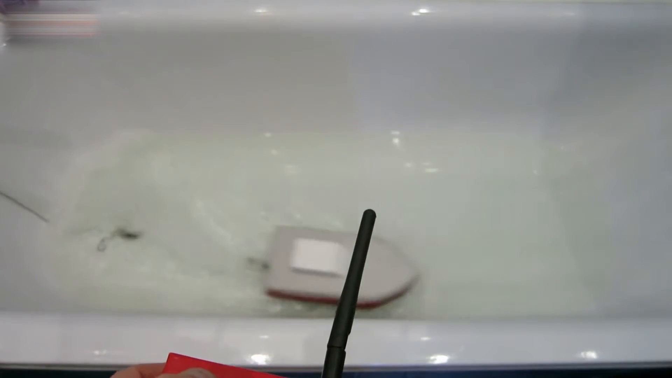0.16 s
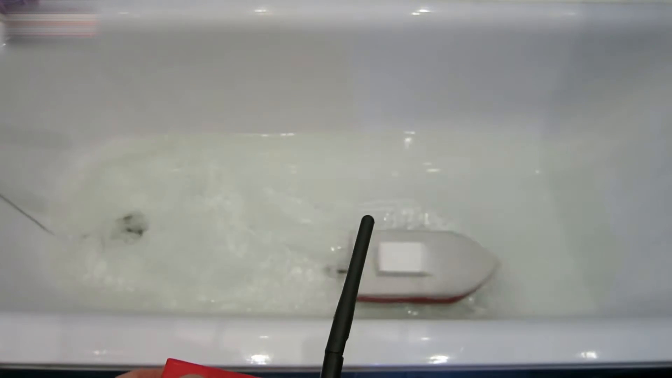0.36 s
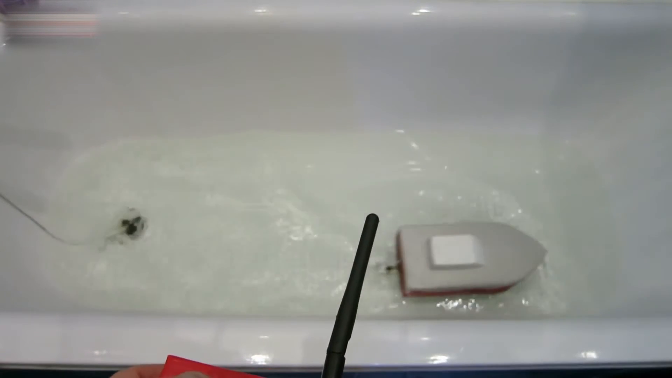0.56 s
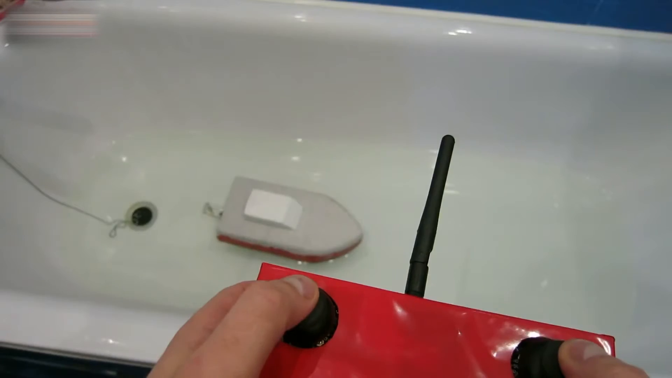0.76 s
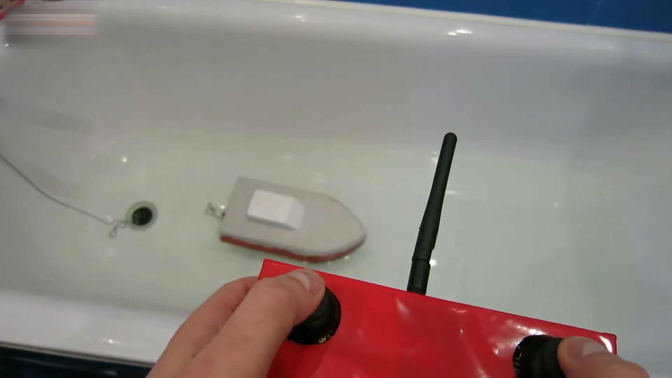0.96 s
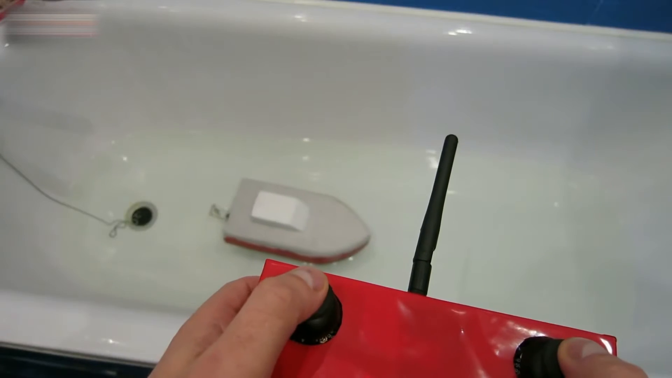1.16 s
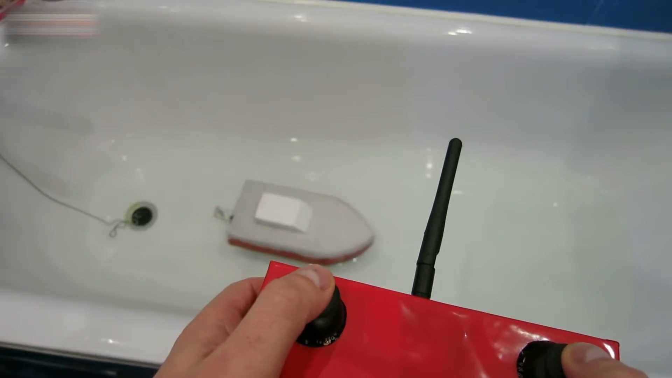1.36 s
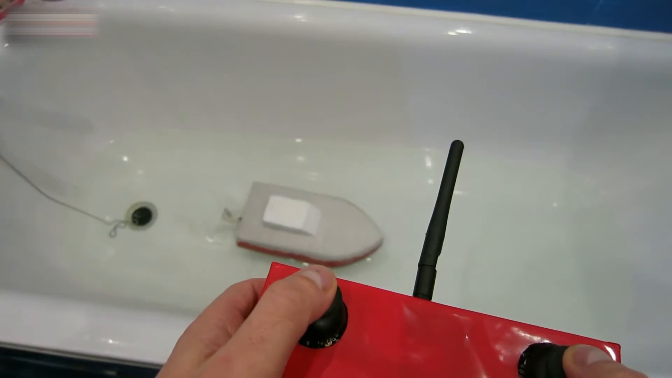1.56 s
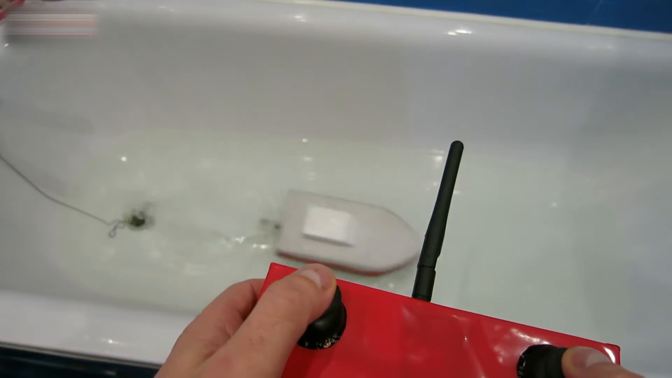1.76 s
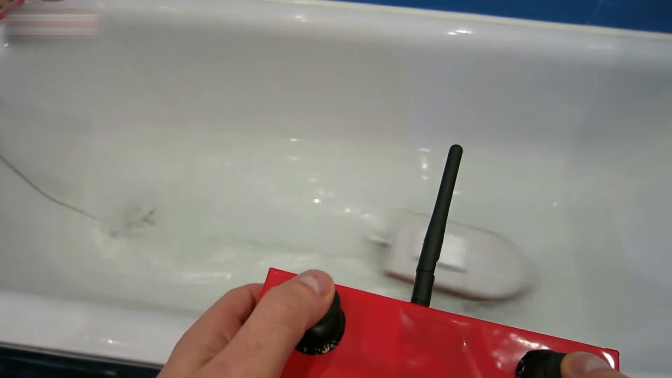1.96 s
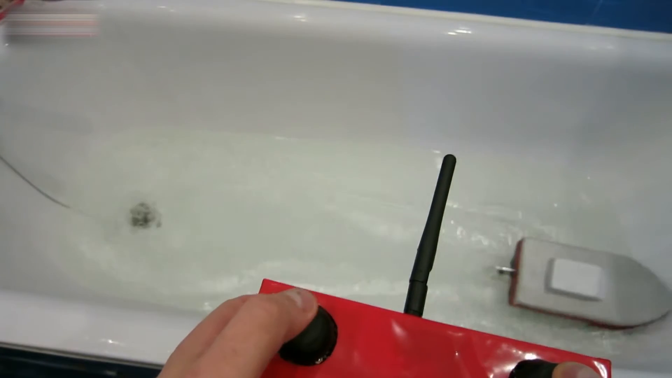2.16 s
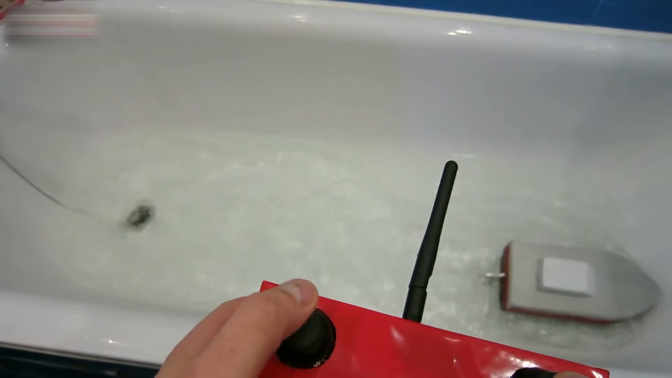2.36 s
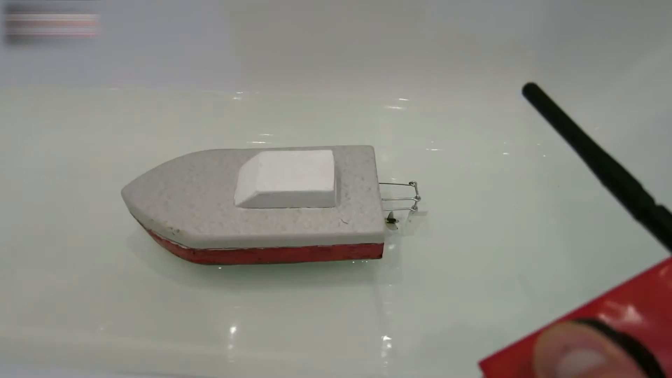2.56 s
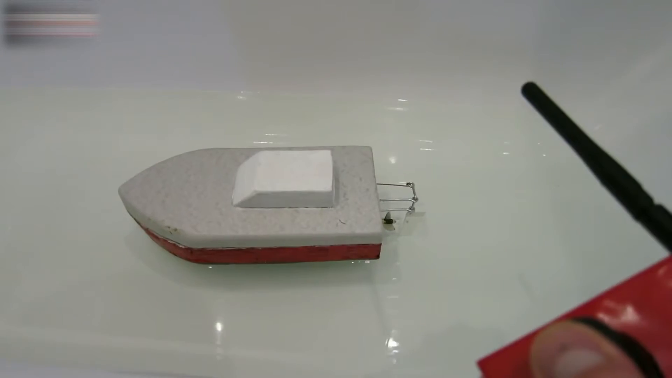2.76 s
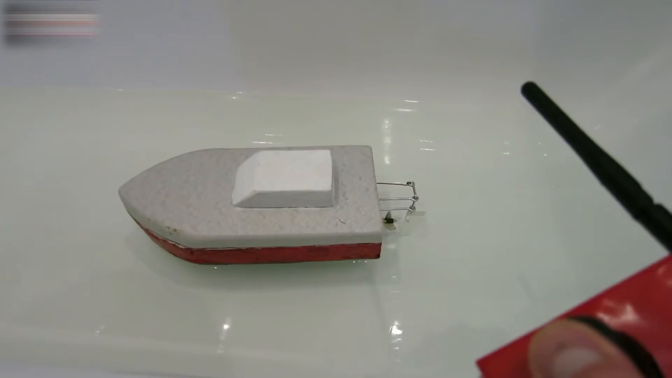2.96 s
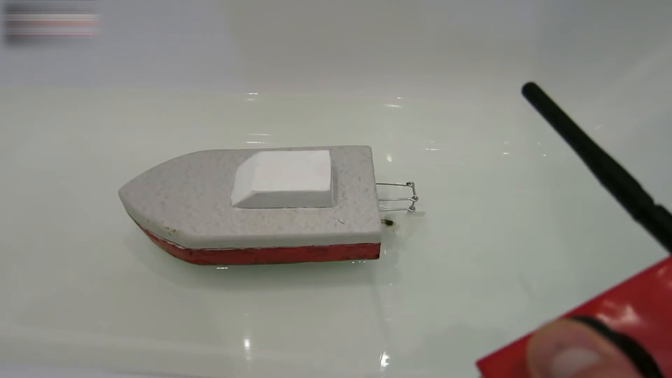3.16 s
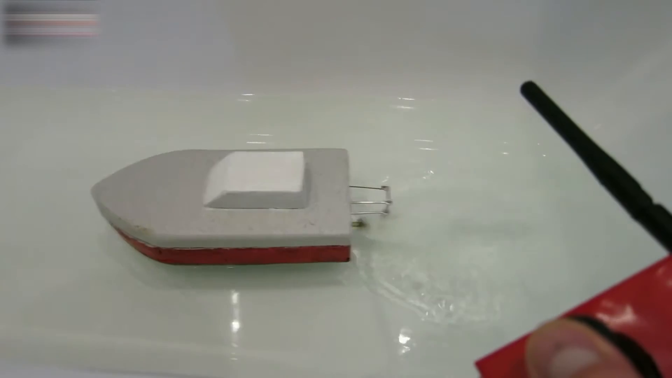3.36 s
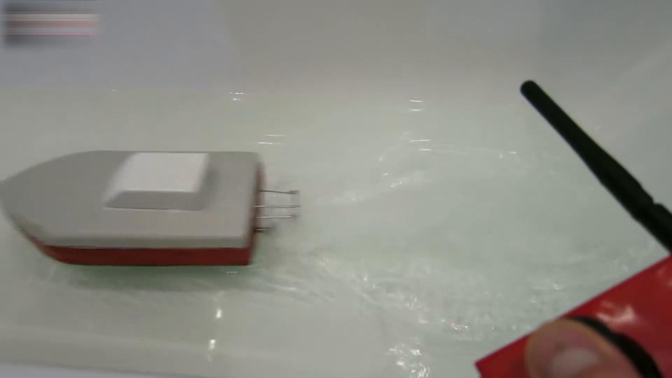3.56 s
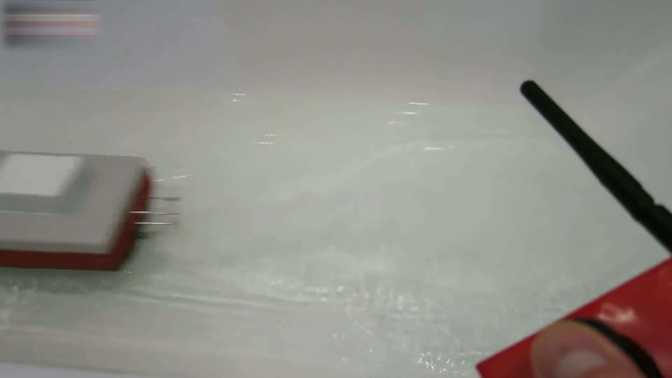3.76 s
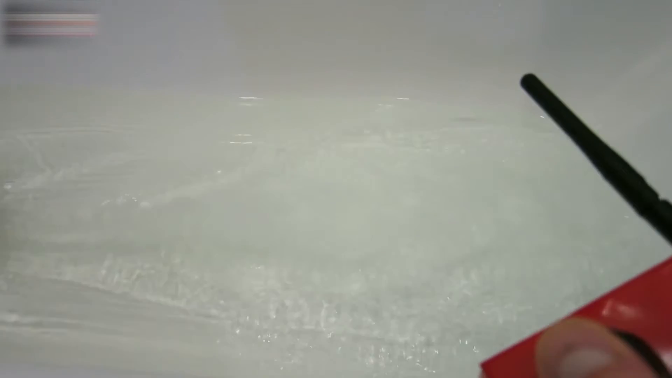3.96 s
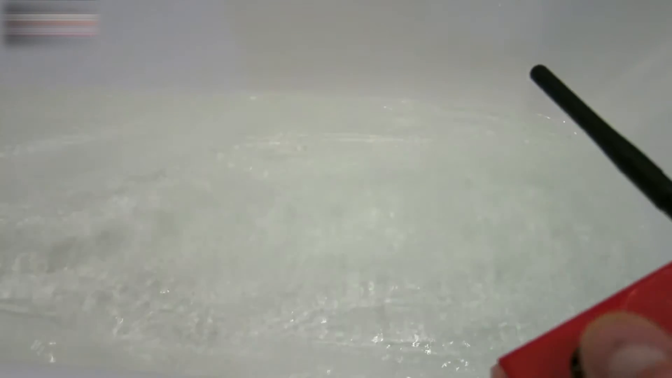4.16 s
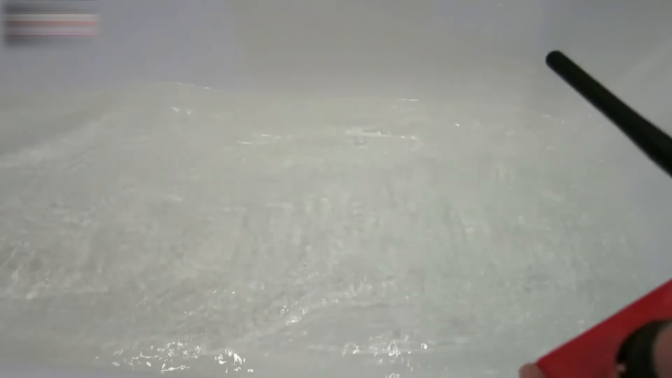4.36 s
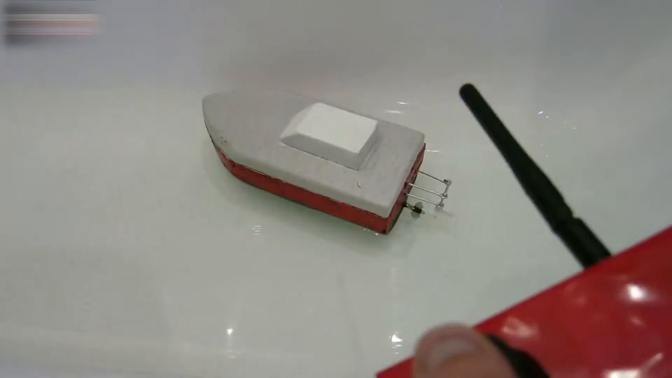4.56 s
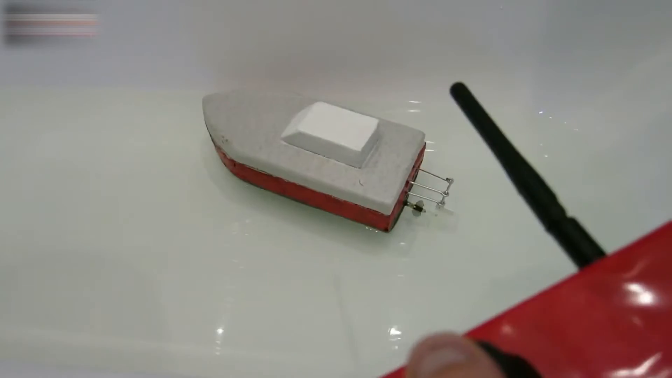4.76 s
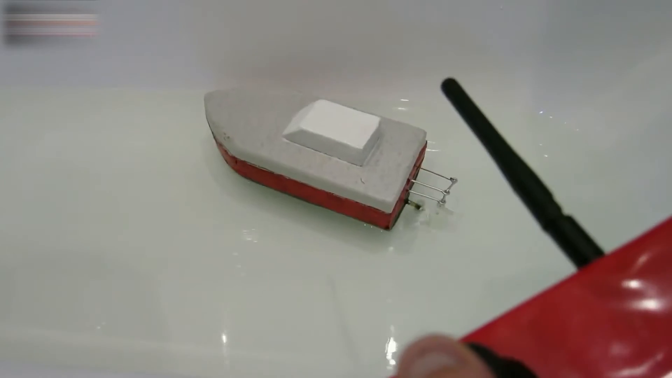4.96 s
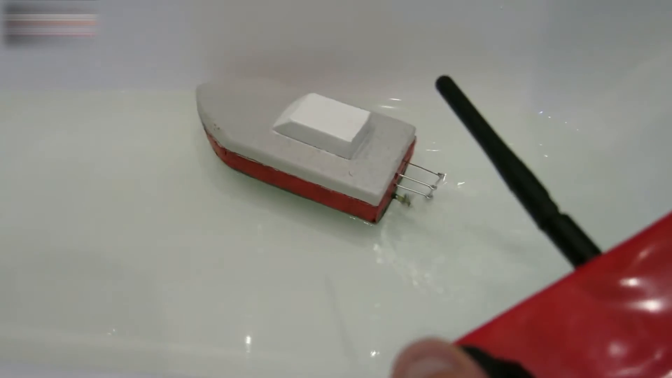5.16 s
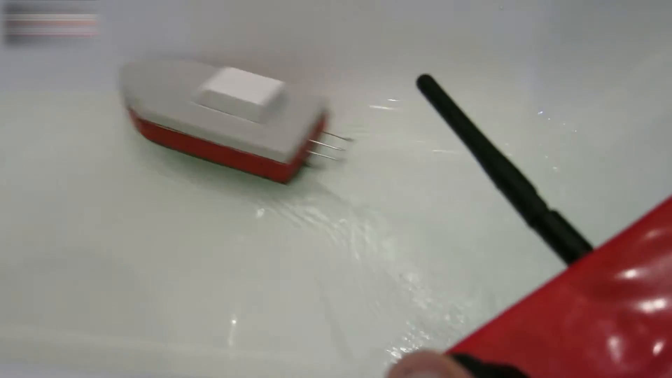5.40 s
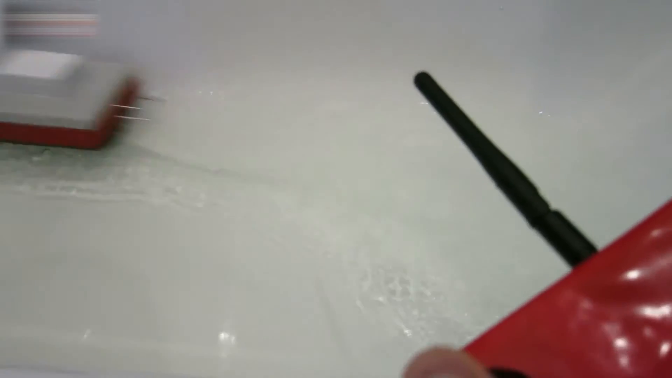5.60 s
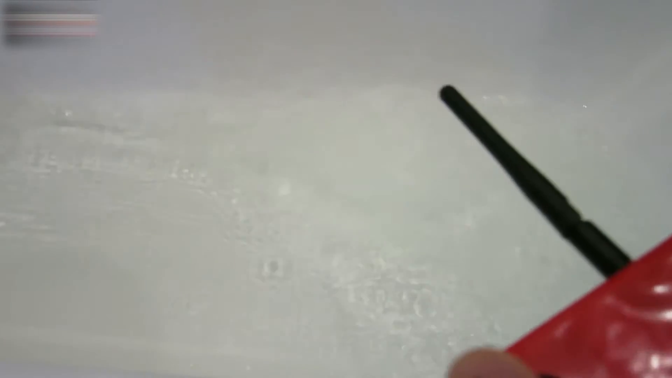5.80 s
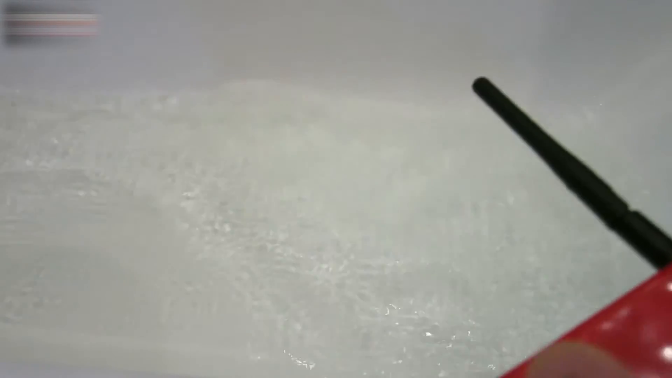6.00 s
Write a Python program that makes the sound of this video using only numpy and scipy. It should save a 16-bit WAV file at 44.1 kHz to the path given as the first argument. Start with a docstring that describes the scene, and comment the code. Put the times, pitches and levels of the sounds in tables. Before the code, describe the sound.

Close stereo pickup beside a bathtub, over dull room noise and faint hum. Four bursts of a small electric propeller, each with hissing spray and bubbling churn, stop suddenly into a short run-down and foam fizz. The first is cut short, the second climbs, the third is a lower growl, the fourth screams highest. Between them come plinking drops, hull knocks on the tub, small ticks and one rasping gear whir.

```python
"""A toy speedboat crosses a bathtub in a hard-walled bathroom, over dull room noise and a faint hum.
At first a dash is already under way: the two-bladed propeller whines, then stops, and foam fizzes.
Two more dashes start with jolts and cracks; the blades thrash air into the water, then spin up.
Drops plink and the hull bumps the tub between dashes; then the rudder servo whirs once.
A last jolt starts the fourth dash, the fastest whine of all; a fast limiter holds down loud parts."""
import sys
import numpy as np
from scipy import signal
from scipy.fft import rfft, irfft, next_fast_len
from scipy.io import wavfile
from scipy.ndimage import uniform_filter1d, minimum_filter1d, map_coordinates

SR = 44100
rng = np.random.default_rng(int(sys.argv[2]) if len(sys.argv) > 2 else 0)


def file_out(sig):
    """Save sig as 16-bit WAV at sys.argv[1]."""
    # one column per channel
    cols = np.atleast_2d(sig).T
    # limit, then scale
    lim = np.clip(cols, -1, 1)
    pcm = np.round(lim * 32767).astype(np.int16)
    wavfile.write(sys.argv[1], SR, pcm)


N = 266099
TIME = np.arange(N) / SR

# The hull bumps the tub: (time [s], knock level [dB], boom level [dB])
BUMPS = [(0.063, -39, -42.5), (2.345, -40.5, -85), (2.351, -31, -84), (4.155, -27, -56), (4.163, -19, -60),
         (4.176, -36, -56), (5.946, -37, -87)]
# Spectrum of churned water: (frequency [Hz], level [dB])
CHURN_COLOUR = [(60, -25), (180, -53), (300, 7), (480, -4.5), (750, 5.5), (1100, -2), (1600, 1.5),
                (2400, -1.5), (3600, -6.5), (5500, -13.5), (8000, -21.5), (15000, -45)]
# Spectrum of bursting foam: (frequency [Hz], level [dB])
FOAM_COLOUR = [(500, 1), (2000, 0.5), (4000, 0), (6500, 0), (9000, 0), (12000, -1), (14000, -8),
               (16000, -32)]
# Spectrum of rasping gear teeth: (frequency [Hz], level [dB])
RASP_COLOUR = [(650, -6.5), (1100, -2), (1390, -10), (1530, 2.5), (1680, -10), (2610, -7), (3010, -4.5),
               (3890, -9), (4790, 2), (5720, -4), (7800, -1.5), (9110, -8), (10200, -5.5), (12100, -11),
               (15500, -31)]
# Spectrum of a jolt of the drive: (frequency [Hz], level [dB])
JOLT_COLOUR = [(100, -38), (300, 5), (480, 9), (800, 8), (1300, 8), (2000, 8), (3200, -9), (5000, -38),
               (6500, -52), (8200, -10.5), (12000, -61), (16000, -37)]
# Standing waves of the tub: (frequency [Hz], width [Hz], level [dB])
TUB = [(92.6, 6.9, 3), (134.3, 19, 12), (177.3, 2.8, 21.5), (219, 6.9, 11), (298, 14, -14), (442.6, 12, 11),
       (536, 12, 7.5), (674, 26, 0), (828, 17, -6), (1120, 140, 3), (1553, 100, 3), (2080, 90, -8)]
# The dashes: (motor on [s], blades bite [s], throttle shut [s], foam stops and room noise returns [s],
# heave level [dB], churn level [dB], spray level [dB], fading as the boat leaves [dB/s],
# stern wave level [dB], shaft wobble level [dB]); the last foam stop lies beyond the end
DASHES = [(-0.6, -0.55, 0.16, 0.74, -42, -41, -42, -4.5, -43, 4.5),
          (1.468, 1.502, 2.18, 2.62, -37, -34.5, -34.5, 12.5, -47.5, -38),
          (3.205, 3.216, 3.888, 4.585, -42.5, -37, -39, 2.5, -38, -5),
          (4.992, 5.069, 5.71, 8.9, -37, -33, -34, 20.5, -64, -28)]
# Speed of the propeller, one table per dash: (time [s], blade rate [Hz])
SPIN_1 = [(0.0, 291), (0.06, 287), (0.1, 296), (0.15, 297), (0.17, 288)]
SPIN_2 = [(1.7, 187), (1.74, 250), (1.765, 304), (1.802, 339), (1.838, 363), (1.942, 366), (2.08, 353),
          (2.112, 363), (2.132, 384), (2.158, 384)]
SPIN_3 = [(3.38, 126), (3.43, 170), (3.462, 221), (3.54, 220), (3.655, 223), (3.69, 249), (3.75, 256),
          (3.85, 254), (3.945, 249)]
SPIN_4 = [(5.225, 134), (5.265, 142), (5.283, 215), (5.3, 258), (5.362, 342), (5.42, 394), (5.49, 446),
          (5.525, 473), (5.555, 486), (5.62, 478), (5.706, 460)]
SPINS = [SPIN_1, SPIN_2, SPIN_3, SPIN_4]


def from_db(db):
    """Decibels to gain."""
    return 10 ** (np.asarray(db) / 20)


def rms_one(x):
    """Scale to unit power."""
    return x / np.sqrt(np.mean(x ** 2) + 1e-20)


def at_hz(points, hz):
    """Read a table on a log-frequency axis."""
    known_hz, values = np.transpose(points)
    return np.interp(np.log(np.maximum(hz, 1)), np.log(known_hz), values)


def level(s, db, release):
    """Gain along a dB curve: silent before it, dying by 60 dB in `release` seconds after it."""
    curve_db = np.interp(TIME, s, db)
    release_db = 60 * np.maximum(TIME - s[-1], 0) / release
    return from_db(curve_db - release_db) * (TIME >= s[0])


def swell(start, rise, hold, t60):
    """Straight rise, hold, then a fall of 60 dB in `t60` seconds."""
    attack = np.clip((TIME - start) / rise, 0, 1)
    return attack * from_db(-60 * np.maximum(TIME - start - rise - hold, 0) / t60)


def drift(rate):
    """Smooth random wander of spread 1, through `rate` random points a second."""
    knots = rng.standard_normal(1 << 14)
    wander = map_coordinates(knots, [TIME[::16] * rate], mode="wrap")
    return rms_one(wander.repeat(16)[:N])


def resonances(modes, hz):
    """Summed boost in dB of resonant peaks at the given frequency."""
    return sum(peak / (1 + (2 * (hz - centre) / width) ** 2) for centre, width, peak in modes)


def coloured(x, spectrum, modes=()):
    """Causal (minimum-phase) filter with the given spectrum and resonant peaks."""
    size = 2 * next_fast_len(len(x) // 2 + 4096)
    hz = np.arange(size // 2 + 1) * SR / size
    db = at_hz(spectrum, hz) + resonances(modes, hz)
    # folding the cepstrum forward in time makes the filter respond only after its input
    cepstrum = irfft(np.log(from_db(db)))
    cepstrum[1:size // 2] *= 2
    cepstrum[size // 2 + 1:] = 0
    return irfft(rfft(x, size) * np.exp(rfft(cepstrum)))[:len(x)]


def grains(per_s, spread_db):
    """Random tiny impacts of uneven size."""
    sizes = from_db(spread_db * np.minimum(rng.exponential(1, N), 4))
    signed = sizes * rng.choice([-1, 1], N)
    return rms_one(signed * (rng.random(N) < per_s / SR))


def burst(t60):
    """Dense reflections that die away; unit energy."""
    t = TIME[:SR // 2]
    tail = rng.standard_normal(len(t)) * from_db(-60 * t / t60)
    return tail / np.linalg.norm(tail)


def knocks(events, spectrum, ring_t60, ring_db, gain_db):
    """A sharp contact, then the dense ring of hull and tub."""
    out = np.zeros(N + SR)
    for s, db, *_ in events:
        blow = from_db(ring_db) * burst(ring_t60)
        blow[0] += 1  # the contact itself
        blow = coloured(blow, spectrum, TUB)
        start = round(s * SR)
        out[start:start + len(blow)] += from_db(db + gain_db) * blow / np.linalg.norm(blow)
    return out[:N]


def bubbles(stir, low_hz, high_hz, per_s, cycles, spread_db):
    """Air pockets of many sizes ring briefly, as hard as the water is stirred."""
    kicks = stir * grains(per_s, spread_db)
    pitches = np.geomspace(low_hz, high_hz, 28)
    dealt = rng.integers(0, len(pitches), N)  # each kick goes to one bubble size
    out = 0
    for k, hz in enumerate(pitches):
        r = from_db(-60 * hz / (cycles * SR))
        w = 2 * np.pi * hz / SR
        gain = np.sin(w) * np.sqrt(2 - 2 * r * r)
        own_kicks = kicks * (dealt == k) + 1e-18
        out = out + signal.lfilter([0, gain], [1, -2 * r * np.cos(w), r * r], own_kicks)
    return out


def ambience():
    """Dull room noise with a faint mains hum; it drops at each bite and returns abruptly at a set time."""
    # Spectrum of the room noise: (frequency [Hz], level [dB])
    room_colour = [(18, -45), (30, -14), (64, -27), (79, -1.5), (102, -22), (156, -4.5), (173, -13.5),
                   (299, -8), (332, -13), (443, -14), (479, -17.5), (546, -15), (6210, -31.5),
                   (13600, -40.5), (15500, -48)]
    dipped = sum((TIME >= bite) & (TIME < back) for _, bite, _, back, *_ in DASHES)
    dip = uniform_filter1d(dipped.astype(float), size=441)  # edges last 10 ms
    gain = from_db(-59 - 14.5 * dip)
    hum = from_db(-5 + 2 * drift(3.14)) * np.sin(2 * np.pi * 100 * TIME)  # 100 Hz
    noise = rms_one(coloured(rng.standard_normal(N), room_colour))
    return gain * (0.66 * noise + hum)


def bathroom(x):
    """Diffuse echo of the hard walls; the bass rings longest."""
    # Ring of the bathroom: (frequency [Hz], time to fall 60 dB [s])
    ring_times = [(80, 1.12), (300, 0.62), (600, 0.41), (2000, 0.3), (6000, 0.22), (14000, 0.16)]
    t = TIME[:SR]
    noise, hz = rfft(rng.standard_normal(SR)), np.arange(SR // 2 + 1)
    edges, echo = 40 * 2 ** np.arange(0, 9.5, .5), 0  # half-octave bands [Hz]
    for low, high in zip(edges, edges[1:]):
        decay = from_db(-60 * t / at_hz(ring_times, np.sqrt(low * high)))
        band_noise = irfft(noise * ((hz >= low) & (hz < high)), SR)
        echo = echo + band_noise * decay / np.linalg.norm(decay)
    return signal.fftconvolve(x, echo)[:N]


def stick_ticks():
    """The control sticks tick faintly: small contacts with a short ring."""
    # Ticks: (time [s], level [dB])
    ticks = [(.823, -43), (1.345, -60), (2.55, -40.5)]
    return knocks(ticks, JOLT_COLOUR, ring_t60=0.11, ring_db=5, gain_db=7.5)


def drops():
    """A trapped bubble rings unsteadily and rises in pitch as it nears the surface."""
    # Single drops and bubbles: (time [s], pitch [Hz], peak level [dB], time to fall 60 dB [s],
    # rise in pitch over that time [share])
    plinks = [(0.371, 946, -50, 0.069, .2), (0.374, 3560, -54, 0.047, .2), (0.681, 1444, -61.5, 0.26, 1.25),
              (0.72, 4440, -62, .05, .2), (2.189, 3010, -35, 0.068, 0.12), (2.202, 2350, -34, 0.025, 0.16),
              (2.24, 4680, -40, 0.026, 0.18), (2.287, 5200, -31, 0.0018, .2),
              (3.222, 1614, -23, 0.032, 3.6), (3.233, 850, -22, 0.014, 3.4), (3.25, 2090, -21, 0.065, 0.18),
              (3.271, 2080, -28.5, 0.071, 0.052), (4.104, 1970, -46, 0.07, 0.22),
              (4.445, 3030, -62, 0.078, .1), (5.003, 1364, -33.5, 0.11, 0.44), (5.067, 935, -49, 0.061, .4),
              (5.087, 1176, -22, 0.046, 0.43), (5.885, 2050, -46, 0.074, 0.53),
              (5.949, 493, -42.5, 0.2, 0.074)]
    out, t = np.zeros(N + SR), TIME[:SR // 4]
    unsteady = 1 + 0.053 * drift(470)
    for s, hz, db, t60, rise in plinks:
        start = round(s * SR)
        glide = 1 + rise * np.minimum(t / t60, 1)
        pitch = hz * glide * np.roll(unsteady, -start)[:len(t)]
        ring = np.sin(2 * np.pi * np.cumsum(pitch) / SR)
        out[start:start + len(t)] += from_db(db - 60 * t / t60) * ring
    return out[:N]


def hull_bumps():
    """The hull bumps the tub: a knock and the dense ring after it."""
    # Spectrum of a bump: (frequency [Hz], level [dB])
    bump_colour = [(35, -53), (60, -11), (109, 5.5), (174, -30), (230, -7), (390, -1), (450, -9), (640, -1),
                   (938, 0), (1150, -5), (2100, -3), (4500, -19), (9000, -23), (14500, -39)]
    return knocks(BUMPS, bump_colour, ring_t60=0.22, ring_db=5.0, gain_db=16)


def shell():
    """Each bump sets the low modes of the tub booming."""
    # Boom of the tub's shell: (frequency [Hz], level [dB], time to fall 60 dB [s])
    modes = [(71.6, -2, 1), (100.5, 4, 0.47), (174.8, 8, 0.84)]
    out = np.zeros(N)
    for s, _, db in BUMPS:
        where = np.flatnonzero(TIME >= s)[:SR]
        age = TIME[where] - s
        boom = sum(from_db(db + mode_db - 60 * age / t60) * np.sin(2 * np.pi * hz * age)
                   for hz, mode_db, t60 in modes)
        out[where] += boom * (1 - np.exp(-age / 0.0046))  # the heavy shell takes a moment to swing
    return out


def gear_ticks():
    """The servo gears take up their play with small clicks."""
    # Clicks: (time [s], level [dB])
    ticks = [(4.753, -48), (4.777, -37.5), (4.832, -30.5)]
    return knocks(ticks, RASP_COLOUR, ring_t60=0.26, ring_db=19, gain_db=16)


def servo(tone_db, rasp_db, jitter):
    """Small plastic gears: an unsteady mesh tone and a rasp of teeth."""
    # One whirr of the rudder servo: (time [s], gear tone [Hz])
    whirr = [(4.773, 796), (4.867, 801), (4.921, 912), (4.944, 853), (4.996, 876)]
    s, mesh_hz = np.transpose(whirr)
    unsteady_hz = np.interp(TIME, s, mesh_hz) * (1 + jitter * drift(250))
    mesh = np.sin(2 * np.pi * np.cumsum(unsteady_hz) / SR)
    contacts = grains(per_s=12000, spread_db=0.5) * (1 + .5 * mesh)
    teeth = rms_one(coloured(contacts, RASP_COLOUR))
    hull = rms_one(coloured(rng.standard_normal(N), CHURN_COLOUR, TUB))
    turning = swell(s[0], rise=0.079, hold=.1, t60=0.32)
    tone = from_db(tone_db) * turning ** 2 * (mesh + 0.46 * hull)
    return tone + from_db(rasp_db) * turning * teeth


def drive_jolts():
    """The drive jolts as the motor starts: a dull blow through hull and tub."""
    # Jolts: (time [s], level [dB])
    jolts = [(1.452, -27), (3.195, -26), (3.222, -24), (3.229, -9.5), (3.236, -14), (5.002, -33),
             (5.062, -14)]
    return knocks(jolts, JOLT_COLOUR, ring_t60=0.049, ring_db=18.0, gain_db=12.0)


def shaft_cracks():
    """Sharp cracks as the shaft breaks loose and the first blade strokes cut the surface."""
    # Cracks: (time [s], level [dB])
    cracks = [(1.452, -33), (1.485, -38), (1.493, -33), (3.195, -34), (3.221, -26), (3.226, -22.5),
              (3.236, -28), (3.245, -13), (3.252, -29), (3.263, -31), (3.276, -37), (5.002, -23.5),
              (5.052, -45), (5.056, -32), (5.063, -23.5), (5.075, -16), (5.097, -23)]
    # Spectrum of a crack: (frequency [Hz], level [dB])
    crack_colour = [(1500, -30), (3500, 0), (4900, 9.5), (6200, -3), (8100, 5), (9500, -4), (11500, -3.5),
                    (15500, -21)]
    return knocks(cracks, crack_colour, ring_t60=0.023, ring_db=21, gain_db=9.5)


def stalled_motor():
    """The pulsed current makes the coils whistle while the straining motor groans ever louder."""
    # The motor before it turns freely: (time [s], length [s], coil whistle [dB], groan [dB])
    stalls = [(1.46, 0.021, -64, -40.5), (3.202, 0.013, -50, -35)]
    coil_hz, groan_hz = 7970, 487
    whistle = np.sin(2 * np.pi * coil_hz * TIME)
    groan = np.sin(2 * np.pi * np.cumsum(groan_hz * (1 + 0.087 * drift(200))) / SR)
    out = 0
    for s, length, whistle_db, groan_db in stalls:
        out = out + from_db(whistle_db) * swell(s, 0.0041, length, .02) * whistle
        out = out + from_db(groan_db) * swell(s, length, 0, 0.069) * groan
    return out


def foam():
    """Countless small bubbles burst at the surface of each wake; finer foam is brighter."""
    # Foam as the throttle shuts, one row per dash: (level [dB], brightness [dB per octave])
    foams = [(-55, 0.6), (-57.5, 2.8), (-54, 4.5), (-49.5, -3)]
    fade_db_per_s = 16  # the foam thins out
    bursts, out = grains(per_s=15000, spread_db=4.5), 0
    for (_, _, shut, stop, *_), (db, tilt) in zip(DASHES, foams):
        colour = [(hz, hz_db + tilt * np.log2(hz)) for hz, hz_db in FOAM_COLOUR]
        fading = level([shut, stop], [db, db - fade_db_per_s * (stop - shut)], release=0.036)
        out = out + fading * rms_one(coloured(bursts, colour))
    return out


def blade_rate(spin):
    """Blade strokes a second; at the end of a dash the water brakes the shaft."""
    s, hz = np.transpose(spin)
    coast_s = 0.188
    return np.interp(TIME, s, hz) * np.exp(-np.maximum(TIME - s[-1], 0) / coast_s)


def stirring(on, bite, shut, nudge_db, rise_s, fade_db_per_s, settle_db_per_s):
    """A nudge, a bite whose grip builds, a slow fade as the boat leaves, then settling."""
    nudging = np.clip((TIME - on) / 0.012, 0, 1)
    biting = np.clip((TIME - bite) / rise_s, 0, 1)
    gripping = np.clip((TIME - bite) / 0.083, 0, 1)
    first_grip_db = -0.5
    start_db = nudge_db * (1 - biting) + first_grip_db * biting * (1 - gripping)
    leaving_db = fade_db_per_s * np.clip(TIME - bite, 0, shut - bite)
    settling_db = settle_db_per_s * np.maximum(TIME - shut, 0)
    return nudging * from_db(start_db - leaving_db - settling_db)


def water_motion():
    """How hard the dashes make the water heave, churn and spray."""
    # The churn and spray dip briefly: (time [s], half length [s], level [dB])
    lulls = [(1.624, 0.012, -5), (3.355, 0.039, -5)]
    heave_below_hz = 247  # faster blades churn the water instead of heaving it
    spray_rise_s = 0.054
    surge = churn = spray = 0
    for dash, spin in zip(DASHES, SPINS):
        on, bite, shut, _, heave_db, churn_db, spray_db, fade, stern_db, _ = dash
        driven = np.clip(np.minimum(TIME - bite, shut - TIME) / spray_rise_s, 0, 1)
        slow = driven / (1 + (blade_rate(spin) / heave_below_hz) ** 8)
        stir = stirring(on, bite, shut, nudge_db=-11, rise_s=0.012,
                        fade_db_per_s=fade, settle_db_per_s=122)
        fling = stirring(on, bite, shut, nudge_db=-25, rise_s=spray_rise_s,
                         fade_db_per_s=fade, settle_db_per_s=204)
        # the stern wave catches up with the slowing hull
        stern = swell(shut, rise=0.054, hold=0, t60=1)
        surge += from_db(heave_db) * slow * stir + from_db(stern_db) * stern
        churn += from_db(churn_db) * stir
        spray += from_db(spray_db) * fling
    lull = from_db(sum(db * np.exp(-((TIME - s) / half) ** 2) for s, half, db in lulls))
    return surge, lull * churn, lull * spray


def spatter(coarse_per_s, fine_per_s, fine_db):
    """Single drops thrown against the hull: coarse ones rap, fine ones glint."""
    # Ring of the hull and its fittings: (frequency [Hz], width [Hz], level [dB])
    hull_modes = [(1100, 180, -3), (2050, 560, 16.5), (8430, 1500, 38.5)]
    coarse = rms_one(coloured(grains(coarse_per_s, spread_db=5), JOLT_COLOUR, hull_modes))
    fine = rms_one(coloured(grains(fine_per_s, spread_db=7.0), FOAM_COLOUR))
    return coarse + from_db(fine_db) * fine


def shifting(x, patchy_db, rate):
    """The sheet of spray keeps changing shape, so each part of its hiss swells and sinks by itself."""
    size = next_fast_len(N)
    spectrum, hz = rfft(x, size), np.arange(size // 2 + 1) * SR / size
    band = np.clip(hz // 1200 - 1, 0, 9)  # mostly 1200 Hz wide
    return rms_one(sum(irfft(spectrum * (band == k), size)[:N] * from_db(patchy_db * drift(rate))
                       for k in np.unique(band)))


def first_splash(spatter_db, mist_db, fizz_db):
    """From a standstill the blades throw coarse drops, then a fine mist that fizzes as it lands."""
    # Splashes: (time [s], rise [s], hold [s], spatter level [dB], mist level [dB])
    splashes = [(1.452, 0.051, 0.031, -47, -39), (3.224, 0.0017, 0.056, -38, -37),
                (5.07, 0.0067, 0.057, -34, -37.5)]
    starting = mist = 0
    for start, rise, hold, drops_db, haze_db in splashes:
        starting = starting + from_db(drops_db) * swell(start, rise, hold, t60=0.67)
        # two rises multiplied make the mist gather slowly at first
        gathering = swell(start, rise + hold, 0, t60=0.89) * swell(start, rise + hold, 1, 1)
        mist = mist + from_db(haze_db) * gathering
    thrown = starting * spatter(coarse_per_s=330, fine_per_s=430, fine_db=-34.0)
    hiss = mist * rms_one(coloured(grains(per_s=8000, spread_db=-1), FOAM_COLOUR))
    fizz = bubbles(mist, low_hz=7010, high_hz=11380, per_s=900, cycles=68, spread_db=5.5)
    return from_db(spatter_db) * thrown + from_db(mist_db) * hiss + from_db(fizz_db) * fizz


def water(surge_db, churn_db, spray_db, bubble_db, chop):
    """Heaving water, collapsing air pockets and flung droplets; the blades chop the last two."""
    # Spectrum of heaving water: (frequency [Hz], level [dB])
    surge_colour = [(25, -27), (50, -52), (75, -3.5), (100, 7), (140, -5), (180, -6.5), (250, -0.5),
                    (450, -26.5)]
    # Spectrum of the hissing spray: (frequency [Hz], level [dB])
    spray_colour = [(1500, -18), (4000, -3), (6000, -4), (8000, -6), (10500, -10), (12500, -12),
                    (14500, -20.5), (16000, -39)]
    surge, churn, spray = water_motion()
    strokes = np.cos(2 * np.pi * np.cumsum(np.interp(TIME, *np.vstack(SPINS).T)) / SR)
    thrash = rms_one(1 + chop * strokes)
    heaving = rms_one(coloured(rng.standard_normal(N), surge_colour, TUB))
    pockets = rms_one(coloured(thrash * grains(per_s=6000, spread_db=2), CHURN_COLOUR, TUB))
    hiss = coloured(thrash * grains(per_s=12000, spread_db=1.5), spray_colour)
    out = from_db(surge_db) * surge * heaving
    out += from_db(churn_db) * churn * pockets
    out += from_db(bubble_db) * bubbles(churn, low_hz=404, high_hz=4310, per_s=500,
                                        cycles=29.0, spread_db=4.5)
    return out + from_db(spray_db) * spray * shifting(hiss, patchy_db=1.5, rate=38)


def propeller(dash, spin, blade_tone, octave_tone, overtones):
    """Blades slap harder with speed; unequal blades add lines halfway between the harmonics."""
    # The hull sings where an overtone meets a resonance: (frequency [Hz], width [Hz], level [dB])
    whine_peaks = [(438, 54, 9), (672, 53, 7.5), (870, 27, 8.5), (1070, 85, 4), (1201, 52, 12),
                   (1427, 23, 12.5)]
    tone_db, upper_db, fall_db_per_octave, speed_db_per_octave = -0.5, -1.5, 3.5, 3
    flutter_db, jitter, rise_s = 3.0, 0.00495, 0.0032
    blur_hz = 3700  # slaps land unevenly, which smears overtones above this pitch into a rasp
    wobble_db, start, end = dash[-1], spin[0][0], spin[-1][0]
    live = (TIME >= start) & (TIME < end + .2)
    t = TIME[live]
    steady = blade_rate(spin)[live]
    # slow blades catch unevenly
    speed = steady * (1 + jitter * drift(120)[live] * (steady.max() / steady) ** 2)
    # the unloaded shaft shudders as it runs down
    shudder = 0.2 * np.clip((t - end) / 0.03, 0, 1) * drift(200)[live]
    phase = 2 * np.pi * np.cumsum(speed * (1 + shudder)) / SR
    running = swell(start, rise_s, end - start - rise_s, t60=0.17)[live]
    slap_db = upper_db + speed_db_per_octave * np.log2(speed / speed.max())
    unloading_db = 600 * np.maximum(t - end, 0)  # once the throttle shuts the blades stop slapping
    tones, multiples = {1: blade_tone, 2: octave_tone}, 3 + np.arange(len(overtones))
    out = np.zeros(N)
    for order in np.arange(2, 25) / 2:
        flutter = flutter_db * drift(32)[live]  # the moving boat shifts the echoes of the tub
        if order in tones:
            db = np.interp(t, *np.transpose(tones[order])) + tone_db + flutter / 2
        else:
            fall_db = fall_db_per_octave * np.log2(max(order / multiples[-1], 1))
            ringing_db = resonances(whine_peaks, order * speed)
            db = np.interp(order, multiples, overtones) - fall_db + slap_db + flutter + ringing_db
            if order % 1:
                db = db + wobble_db
        smear = (order * speed / blur_hz) ** 2 * drift(400)[live] * (order > 2)
        wave = np.sin(order * phase + smear + rng.uniform(0, 2 * np.pi))
        out[live] += np.sqrt(2) * running * from_db(db - unloading_db * (order > 1)) * wave
    return out


def whine():
    """The propeller in all four dashes, its pitch following the blade rate."""
    # Strength of the blade tone, one list per dash: (time [s], level [dB])
    blade_tones = [
        [(0.0, -38.5), (0.06, -34.5), (0.09, -35), (0.144, -26.5), (0.17, -31.5)],
        [(1.7, -42), (1.74, -31.5), (1.78, -34.5), (1.826, -25.5), (1.87, -37), (1.97, -47), (2.04, -38),
         (2.11, -30), (2.158, -30)],
        [(3.38, -44), (3.44, -44), (3.476, -31), (3.54, -28.5), (3.65, -33), (3.72, -44), (3.8, -35.5),
         (3.87, -49), (3.945, -50.5)],
        [(5.24, -36.5), (5.29, -30.5), (5.345, -40), (5.39, -31), (5.46, -25.5), (5.53, -27), (5.58, -33.5),
         (5.64, -32), (5.69, -22), (5.72, -28)],
    ]
    # Strength of the octave above it, one list per dash: (time [s], level [dB])
    octave_tones = [
        [(0.0, -36), (0.09, -34), (0.135, -50), (0.17, -35)],
        [(1.72, -36.5), (1.785, -39), (1.82, -38), (1.87, -33), (1.935, -48), (1.995, -29), (2.065, -41),
         (2.15, -35.5)],
        [(3.44, -50), (3.485, -38), (3.56, -46.5), (3.655, -46), (3.71, -36.5), (3.78, -33), (3.83, -44),
         (3.9, -34), (3.945, -37.5)],
        [(5.33, -46), (5.365, -31), (5.405, -31.5), (5.465, -39), (5.52, -39), (5.59, -38), (5.66, -43.5),
         (5.706, -34)],
    ]
    # Overtones of the slap, one row per dash: (multiple 3 [dB], 4 [dB], 5 [dB], 6 [dB], 7 [dB])
    overtones = [(-55, -51, -72, -67, -62), (-42, -45.5, -47, -42, -46.5), (-49, -46, -59, -48, -53.5),
                 (-40, -49, -44.5, -47, -49.5)]
    return sum(propeller(*parts) for parts in zip(DASHES, SPINS, blade_tones, octave_tones, overtones))


def tub_sound():
    """Everything that sounds in the tub, with the echo of the room."""
    blades = whine()
    wash = water(surge_db=-5.5, churn_db=4.0, spray_db=3.5, bubble_db=-2.5, chop=0.079)
    wash += first_splash(spatter_db=-7, mist_db=-5.0, fizz_db=0)
    gears = servo(tone_db=-43.5, rasp_db=-43.5, jitter=0.064) + gear_ticks()
    hits = drive_jolts() + stalled_motor() + shaft_cracks()
    hits += stick_ticks() + hull_bumps() + drops()
    to_room = from_db(-7.0) * blades + from_db(-7.5) * (wash + gears) + from_db(-1.0) * hits
    return blades + wash + gears + hits + shell() + bathroom(to_room) + foam()


def scene():
    """The two close microphones share the bass of the tub; treble and far background differ."""
    # Side against mid for the tub: (frequency [Hz], level [dB])
    width = [(30, -9), (60, -14), (125, -21.5), (350, -22), (950, -15.5), (2400, -12.5), (6000, -9.3),
             (13000, -4.3)]
    # The same for the far, diffuse background: (frequency [Hz], level [dB])
    room_width = [(60, -12), (150, 3.5), (380, 5), (2400, 2.5), (6000, -2)]
    # The left microphone against the right: (frequency [Hz], level [dB])
    balance = [(250, -0.8), (1000, -0.3), (4000, 0.4), (8000, 1.5)]
    mid = tub_sound() + ambience()
    side = coloured(tub_sound(), width) + coloured(ambience(), room_width)
    return np.array([coloured(mid + sign * side, [(hz, sign * db / 2) for hz, db in balance])
                     for sign in (1, -1)])  # left, right


def limiter(x, ceiling_db, release_db_per_s):
    """The gain drops at once on a peak and recovers at a steady rate."""
    over = np.maximum(20 * np.log10(np.abs(x).max(axis=0) + 1e-9) - ceiling_db, 0)
    recovery = release_db_per_s * TIME
    held = np.maximum.accumulate(over + recovery) - recovery
    # smoothed over under 1 ms, looking slightly ahead
    return x * uniform_filter1d(minimum_filter1d(from_db(-held), size=33), size=33)


def record(dry):
    """The microphone loses the deep bass, peaks are held down and the top is cut."""
    thin = signal.sosfilt(signal.butter(2, 45, "high", fs=SR, output="sos"), dry)
    held = limiter(thin, ceiling_db=-20.4, release_db_per_s=900)
    return signal.sosfilt(signal.ellip(10, .1, 90, 15700, fs=SR, output="sos"), held)


dry = scene()
out = record(dry)
file_out(out)
```